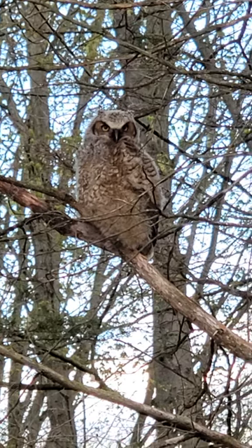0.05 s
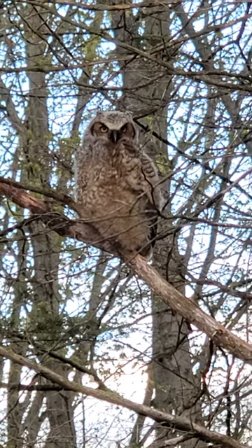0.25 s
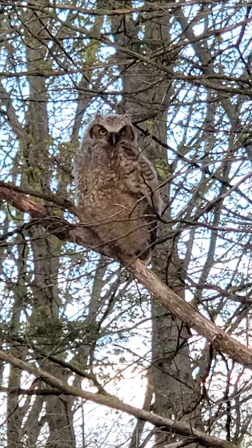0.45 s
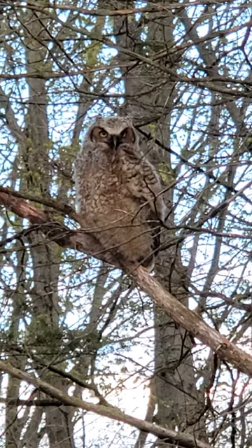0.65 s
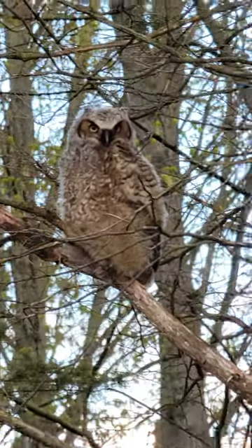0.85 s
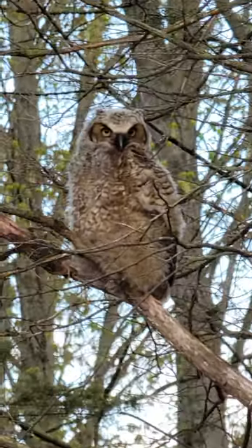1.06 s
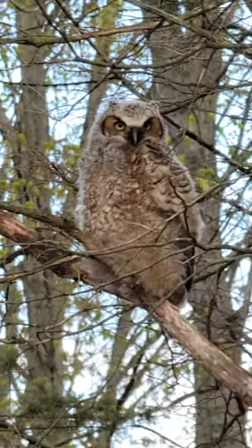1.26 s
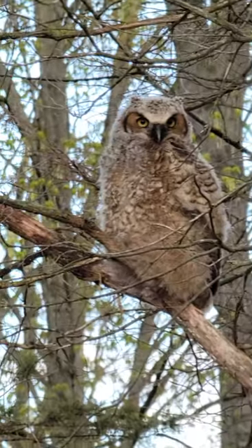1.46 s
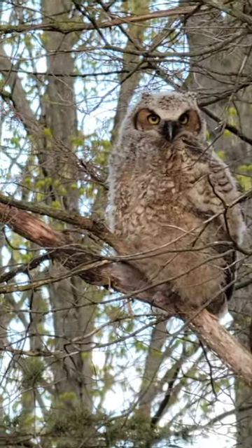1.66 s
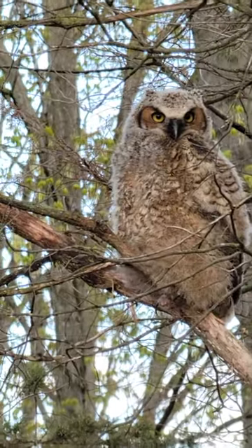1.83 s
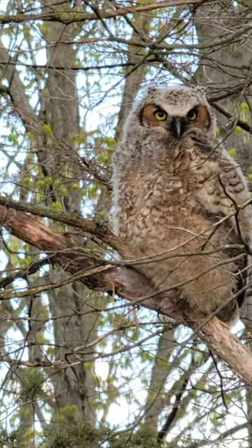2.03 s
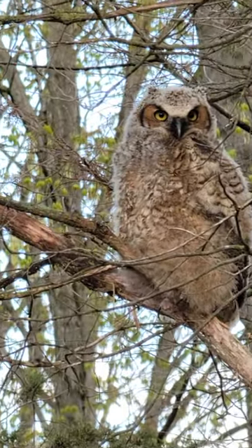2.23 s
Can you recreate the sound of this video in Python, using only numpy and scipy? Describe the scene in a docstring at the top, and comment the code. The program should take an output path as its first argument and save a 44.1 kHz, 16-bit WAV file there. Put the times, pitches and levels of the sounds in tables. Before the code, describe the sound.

A young owl gives one short, raspy, hissing screech in quiet woods over a low rumble

```python
"""Small birds chirp far off, thin gliding tones over a low rumble, distant traffic and hiss made of shaped noise.
The hand-held camera is knocked lightly: clicks and sinking thuds early and again late, finger ticks only early.
Wheezing strands lead a young owl into one raspy screech from a branch: air hisses through a narrow throat
over a thin voiced tone, then slides down into a short whistle. The trunks throw it back.
A faint high rustle follows, the background treble rises, and a nearer bird's chip sweeps steeply down."""
import sys
import numpy as np
from scipy import signal
from scipy.fft import rfft, irfft
from scipy.io import wavfile
from scipy.ndimage import uniform_filter1d

SR = 44100
rng = np.random.default_rng(int(sys.argv[2]) if len(sys.argv) > 2 else 0)


def store_wav(level_fs):
    """Save 16-bit WAV to argv[1]."""
    pcm = np.round(np.clip(np.atleast_2d(level_fs), -1, 1) * 32767)
    wavfile.write(sys.argv[1], SR, pcm.T.astype(np.int16))


N = 101165
TIME = np.arange(N) / SR
HZ = np.fft.rfftfreq(N, 1 / SR)


def amp(db):
    """Turns decibels into gain."""
    return 10 ** (np.asarray(db) / 20)


def unit(x):
    """Scales a sound to an rms (average strength) of 1."""
    return x / np.sqrt(np.mean(x ** 2) + 1e-20)


def at_hz(points, hz):
    """Reads a table by pitch, on a log-frequency axis as the ear hears it."""
    table_hz, value = np.transpose(points)
    return np.interp(np.log(hz + 1), np.log(table_hz), value)


def colour(x, points):
    """Makes each frequency louder or softer, following a table of decibels."""
    return irfft(rfft(x) * amp(at_hz(points, HZ)), N)


def curve(points, axis=1):
    """Reads one column of a time table at every sample."""
    table = np.array(points)
    return np.interp(TIME, table[:, 0], table[:, axis])


def during(points):
    """Gives 1 within a table's time span, else 0."""
    return (TIME > points[0][0]) * (TIME < points[-1][0])


def pan(db):
    """Gives left and right gains for a level difference; positive is louder on the left."""
    return amp(np.array([np.atleast_1d(db), -np.atleast_1d(db)]) / 2)


def wander(hz):
    """Makes smooth random movement of rms 1, mostly slower than the given rate."""
    return unit(irfft(rfft(rng.standard_normal(N)) * np.exp(-(HZ / hz) ** 2), N))


def resonate(x, hz, width):
    """Rings a sound at a moving frequency: shift it down to zero, smooth it steeply, shift it back."""
    turn = np.exp(2j * np.pi * np.cumsum(hz * np.ones(N)) / SR)
    r = np.exp(-np.pi * width / SR)
    smooth = signal.lfilter([1], [1, -2 * r, r * r], x / turn)
    return unit((turn * smooth).real)


def woods(x, t60):
    """Adds up countless tree echoes as fading noise, different on each side; t60 is the time to fall 60 dB."""
    hz, t, z = signal.stft(rng.standard_normal((2, SR)), SR, nperseg=256)
    fade = 1e-3 ** (t / at_hz(t60, hz)[:, None])
    tail = signal.istft(z * fade, SR, nperseg=256)[1]
    return signal.fftconvolve(np.atleast_2d(x), tail / np.linalg.norm(tail[0]), axes=1)[:, :N]


# force of the screech: start_s, level_db
EFFORT = [(0.48, -88), (0.51, -66), (0.526, -56.5), (0.545, -64.5), (0.598, -57), (0.625, -45.5),
          (0.65, -43.5), (0.672, -40), (0.694, -35), (0.8, -35.5), (0.885, -37.5), (0.903, -39.5),
          (0.917, -46), (0.928, -56.5), (0.937, -61)]
# main throat resonance, which the whistle follows too: start_s, pitch_hz
THROAT = [(0.51, 2400), (0.526, 3700), (0.6, 3500), (0.632, 3600), (0.645, 4000), (0.685, 3620),
          (0.8, 3520), (0.88, 3430), (0.9, 2930), (0.914, 2300), (0.937, 1850)]
# broad hiss of the open beak: pitch_hz, relative_level_db (per Hz)
HISS = [(300, -56), (1400, -30), (1850, -7.5), (2500, -17.5), (3000, 2.5), (3800, 7.5), (4200, 8.5),
        (4800, 1.5), (5650, -1.5), (6200, -17), (7400, -14.5), (7800, -31), (8800, -16), (10200, -48),
        (15000, -55)]
# weak voiced tone: start_s, pitch_hz, level_db
VOICE = [(0.67, 898.4, -87), (0.695, 902.6, -55), (0.73, 953, -65), (0.752, 948, -53), (0.846, 938, -53),
         (0.865, 928, -72), (0.89, 929, -51.5), (0.92, 935, -90)]
# thin wheezing strands that lead in: middle_s, half_length_s, pitch_hz, width_hz, level_db
STRANDS = [(0.589, 0.072, 2566, 104, -63.5), (0.597, 0.045, 5600, 130, -73.5),
           (0.658, 0.016, 5560, 110, -61)]
THROAT_WIDTH_HZ, THROAT_DB, HISS_DB, WHISTLE_DB = 520, -6, -2.8, -4.5
# until the beak opens the hiss is weaker and the whistle less torn
SOFT_HISS_DB, OPEN_S, OPENING_S, SOFT_TEAR = -10, .635, .115, .6
VOICE_JITTER, VOICE_GATING, RASP, RASP_HZ = .012, .5, .12, 500
# the throat flutters, and each flap lets out a short burst of air (share of one flap)
FLUTTER_HZ, FLUTTER_JITTER, FLAP_GAIN, FLAP_SHARE = 100, .06, .9, .15
# as the call closes, the torn whistle steadies and gains on the hiss
CLOSE_S, CLOSING_S, CLOSED_HISS_DB, CLOSED_WHISTLE_DB = .878, .03, -7, 4
TORN_JITTER, STEADY_JITTER, JITTER_HZ, OCTAVE_DB = .135, .024, 992, -9


def screech():
    """Fluttering puffs of air, gated by the voice, ring the throat; a torn whistle steadies and falls at the end."""
    voice_phase = 2 * np.pi * np.cumsum(curve(VOICE) * (1 + VOICE_JITTER * wander(265))) / SR
    flaps = np.cumsum(FLUTTER_HZ * (1 + FLUTTER_JITTER * wander(FLUTTER_HZ))) / SR
    bursts = 1 + FLAP_GAIN * np.exp(-((flaps % 1 - .5) / FLAP_SHARE) ** 2)
    flutter = bursts * np.exp(RASP * wander(RASP_HZ))
    puffs = (1 + VOICE_GATING * np.cos(voice_phase)) * flutter
    # both run from 0 to 1
    opened = np.clip((TIME - OPEN_S) / OPENING_S, 0, 1)
    closed = np.clip((TIME - CLOSE_S) / CLOSING_S, 0, 1)

    throat_hz = curve(THROAT)
    ring = resonate(puffs * rng.standard_normal(N), throat_hz, THROAT_WIDTH_HZ)
    hiss = unit(colour(puffs * rng.standard_normal(N), HISS))
    hiss = hiss * amp(SOFT_HISS_DB * (1 - opened))

    # fast random pitch changes tear the whistle
    torn = np.maximum(opened, SOFT_TEAR) * (1 - closed)
    jitter = STEADY_JITTER + (TORN_JITTER - STEADY_JITTER) * torn
    turn = 2 * np.pi * np.cumsum(throat_hz * (1 + jitter * wander(JITTER_HZ))) / SR
    tone = np.sin(turn) + closed * amp(OCTAVE_DB) * np.sin(2 * turn)
    whistle = unit(np.sqrt(puffs * flutter) * tone)

    breath = amp(CLOSED_HISS_DB * closed) * (amp(THROAT_DB) * ring + amp(HISS_DB) * hiss)
    rasp = breath + amp(WHISTLE_DB + CLOSED_WHISTLE_DB * closed) * whistle
    lead = np.zeros(N)
    for middle, half_length, hz, width, db in STRANDS:
        swell = amp(db) * np.exp(-((TIME - middle) / half_length) ** 2)
        lead += swell * resonate(rng.standard_normal(N), hz, width)
    voice = unit(np.sin(voice_phase)) * amp(curve(VOICE, axis=2)) * during(VOICE)
    return rasp * amp(curve(EFFORT)) * during(EFFORT) + lead + voice


# fixed colour of the mouth, over the whole call: pitch_hz, gain_db
MOUTH = [(1900, 0), (2650, -2), (3000, 1), (3800, 1), (4100, -4), (4550, 0), (5600, 1), (9000, 0),
         (11000, -14)]
# side the owl is heard on: pitch_hz, left_minus_right_db
OWL_PAN = [(900, 0), (2000, 0), (3000, 6.5), (3700, -1.5), (5300, 1.5), (6800, -7), (9000, -3)]
# echoes from the nearest trunks: delay_s, left_gain, right_gain (plain factors, minus flips the wave)
TRUNKS = [(.0043, 0.015, -0.43), (.0072, 0.53, -0.19), (.0115, .22, .2), (0.0201, 0.02, 0.33)]
# how long the wood rings, for owl and songbirds: pitch_hz, fall_by_60_db_s
WOOD_T60 = [(500, 0.2), (3500, 0.67), (9000, 0.19)]
OWL_LEAD_S = .000052  # the left microphone hears it first
OWL_WET_DB, SCATTER_DB, SCATTER_T60_S = -18, -8.5, .07


def owl():
    """The screech arrives directly, off near trunks and branches, and from the wood behind."""
    call = colour(screech(), MOUTH)
    delays = np.array([[0], [OWL_LEAD_S]])
    direct = irfft(rfft(call) * np.exp(-2j * np.pi * HZ * delays), N)
    echoes = np.zeros((2, N))
    for delay, left, right in TRUNKS:
        echoes += np.array([[left], [right]]) * np.roll(call, round(delay * SR))
    near = direct + echoes + amp(SCATTER_DB) * woods(call, [(1, SCATTER_T60_S)])
    near = irfft(rfft(near) * pan(at_hz(OWL_PAN, HZ)), N)
    return near + amp(OWL_WET_DB) * woods(call, WOOD_T60)


# far songbirds: start_s, length_s, first_pitch_hz, last_pitch_hz, level_db
CHIRPS = [(-.01, 0.044, 4227, 4156, -59.5), (0.027, 0.058, 4184, 4070, -60),
          (0.283, 0.044, 5200, 4500, -78), (0.344, 0.041, 4160, 3980, -69.5),
          (0.466, 0.077, 3550, 3590, -63.5), (0.525, 0.028, 3900, 4170, -60),
          (1.316, 0.09, 3420, 3366, -77), (1.455, 0.065, 2612, 2450, -63.5),
          (1.564, 0.048, 4070, 4210, -61), (1.961, 0.078, 2970, 2790, -75), (2.073, 0.074, 2710, 2890, -75),
          (2.148, 0.042, 2670, 2447, -63), (2.182, 0.04, 2540, 2406, -68.5)]
# a nearer bird's chip sweeps steeply down: start_s, pitch_hz, level_db
CHIP = [(2.23, 6100, -85), (2.246, 5400, -64), (2.258, 4400, -58), (2.268, 3250, -61), (2.275, 2850, -68)]
CHIRP_EDGE_S, CHIRP_JITTER, BIRD_WET_DB = .014, .008, -10
CHIP_SCATTER_DB, CHIP_SCATTER_T60_S = 3.5, .16


def songbirds():
    """Thin gliding whistles from deep in the wood, and one sharp chip that the branches scatter."""
    song, waver = np.zeros(N), 1 + CHIRP_JITTER * wander(188)
    for start, length, first_hz, last_hz, db in CHIRPS:
        t = TIME - start
        hz = np.interp(t, [0, length], [first_hz, last_hz]) * waver
        edges = np.clip(np.minimum(t, length - t) / CHIRP_EDGE_S, 0, 1)
        song += amp(db) * edges * np.sin(2 * np.pi * np.cumsum(hz) / SR)
    chip = np.sin(2 * np.pi * np.cumsum(curve(CHIP)) / SR)
    chip = chip * amp(curve(CHIP, axis=2)) * during(CHIP)
    far = song + amp(BIRD_WET_DB) * woods(song, WOOD_T60)
    return far + chip + amp(CHIP_SCATTER_DB) * woods(chip, [(1, CHIP_SCATTER_T60_S)])


# knocks on the camera: start_s, click_db, click_rate_hz (higher is shorter and brighter), thud_db,
# left_minus_right_db
KNOCKS = [(.0338, -43, 2200, -46, -2), (.1224, -39.5, 900, -45, -13), (.1445, -54, 450, -55, -11),
          (1.851, -43.5, 520, -60, -12), (1.9085, -57, 300, -52, -11)]
THUD_S, THUD_HIGH_HZ, THUD_LOW_HZ, THUD_SAG_S = .0096, 560, 72, .0032


def knocks():
    """Each knock is a sharp click and a thud that sinks in pitch."""
    out = np.zeros((2, N))
    for start, click_db, click_hz, thud_db, pan_db in KNOCKS:
        t = np.maximum(TIME - start, 0)
        u = 2 * np.pi * click_hz * t
        click = u * (2 - u) * np.exp(-u)
        hz = THUD_LOW_HZ + (THUD_HIGH_HZ - THUD_LOW_HZ) * np.exp(-t / THUD_SAG_S)
        thud = np.exp(-t / THUD_S) * np.sin(2 * np.pi * np.cumsum(hz * (t > 0)) / SR)
        out += pan(pan_db) * (amp(click_db) * click / abs(click).max() + amp(thud_db) * thud)
    return out


# fingers tick on the camera's case: start_s, level_db, left_minus_right_db
TICKS = [(.0103, -59, 8), (.0338, -49, 11), (.1285, -58, -3), (.153, -59, -3)]
TICK_S, TICK_HZ, TICK_WIDTH_HZ = .0007, 6600, 3500


def ticks():
    """Tiny bright bursts from the case: ringing noise that starts at once and dies away."""
    level = np.zeros((2, N))
    for start, db, pan_db in TICKS:
        fade = (TIME > start) * np.exp(-abs(TIME - start) / TICK_S)
        level += pan(pan_db) * amp(db) * fade
    return level * resonate(rng.standard_normal(N), TICK_HZ, TICK_WIDTH_HZ)


RUSTLE_S, RUSTLE_RISE_S, RUSTLE_FADE_S = .93, .14, .17
RUSTLE_HZ, RUSTLE_WIDTH_HZ, RUSTLE_DB = 8330, 3000, -66.5


def rustle():
    """A brief, faint brush of high noise after the call, separate on each side."""
    t = np.maximum(TIME - RUSTLE_S, 0)
    level = amp(RUSTLE_DB) * np.minimum(t / RUSTLE_RISE_S, 1) * np.exp(-(t / RUSTLE_FADE_S) ** 2)
    noises = rng.standard_normal((2, N))
    return level * np.array([resonate(noise, RUSTLE_HZ, RUSTLE_WIDTH_HZ) for noise in noises])


# colour of the background: pitch_hz, relative_level_db (per Hz)
AIR = [(20, -3), (30, -37), (42, -13), (65, 1.5), (98, -6), (135, -21.5), (190, -22), (400, -24),
       (540, -18), (720, -23), (1050, -17.5), (1220, -23), (1500, -30), (2200, -34.5), (2700, -34),
       (3600, -40), (7000, -41.5), (10800, -51.5), (15500, -44)]
# how alike the two sides are: pitch_hz, likeness (0 unrelated, 1 the same)
AIR_SAME = [(60, 0.98), (130, 0.56), (260, 0.39), (600, 0.82), (1100, 0.52), (2500, 0.0049), (6000, 0),
            (15000, 0.068)]
# side the background leans to: pitch_hz, left_minus_right_db
AIR_PAN = [(60, -1.3), (200, -1), (600, -1), (1200, -3), (3000, 2.5), (8000, 1.5), (13000, 2.5)]
# the rumble swells twice and dips slightly once, each briefly: middle_s, gain_db
SWELLS = [(0.141, 8.5), (0.612, 8.5), (1.93, -1)]
# rise and fall of the background treble: start_s, gain_db
TREBLE = [(0, 0.5), (.15, 4), (.22, 0), (.5, 2.5), (1.2, 1), (1.55, 2.5), (1.72, 6), (1.9, 7.5), (2.08, 3),
          (2.29, 5)]
AIR_DB, PATCHY_DB = -54.5, 1.22
SWELL_S, RUMBLE_TOP_HZ, TREBLE_FROM_HZ = .035, 120, 2500


def air():
    """Low rumble, far traffic and a fine hiss: random noise shaped by pitch and time, drifting in patches."""
    size = 2048  # samples in each short slice of sound
    hz, t = np.fft.rfftfreq(size, 1 / SR), np.arange(0, N + 2 * size, size // 4) / SR
    a, b, c, d, patches = rng.standard_normal((len(t), len(hz), 5)).T
    patches = uniform_filter1d(patches, size=14, axis=0)
    patches = unit(uniform_filter1d(patches, size=8, axis=1))

    # the right side shares part of the left side's noise
    same = np.clip(at_hz(AIR_SAME, hz), -1, 1)[:, None]
    left = a + 1j * b
    right = same * left + np.sqrt(1 - same ** 2) * (c + 1j * d)
    sides = np.array([left, right]) * pan(at_hz(AIR_PAN, hz))[:, :, None]

    treble_share = hz ** 2 / (hz ** 2 + TREBLE_FROM_HZ ** 2)
    treble = np.outer(treble_share, np.interp(t, *np.transpose(TREBLE)))
    swell_db = sum(db * np.exp(-((t - middle) / SWELL_S) ** 2) for middle, db in SWELLS)
    swells = np.outer(hz < RUMBLE_TOP_HZ, swell_db)
    sides = sides * amp(at_hz(AIR, hz)[:, None] + PATCHY_DB * patches + treble + swells)
    noise = signal.istft(sides, nperseg=size, noverlap=size * 3 // 4)[1][:, :N]
    return amp(AIR_DB) * unit(noise)


def scene():
    """The owl and everything around it."""
    return owl() + songbirds() + knocks() + ticks() + rustle() + air()


LOW_CUT_HZ, EDGE_HZ = 31.3, 15850


def record(dry):
    """The microphone's low cut and the recorder's band limit."""
    low_cut = signal.butter(3, LOW_CUT_HZ, "high", fs=SR, output="sos")
    band_limit = signal.firwin(511, EDGE_HZ, window=("kaiser", 9), fs=SR)
    return signal.oaconvolve(signal.sosfilt(low_cut, dry), band_limit[None], "same")


dry = scene()
out = record(dry)
store_wav(out)
```